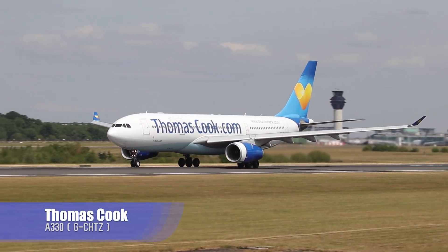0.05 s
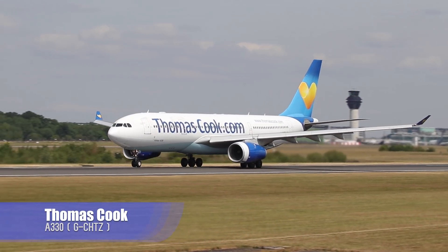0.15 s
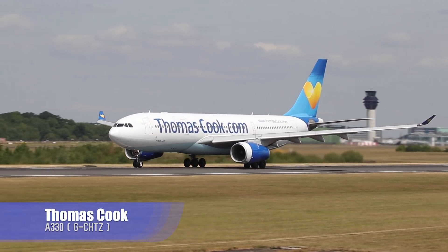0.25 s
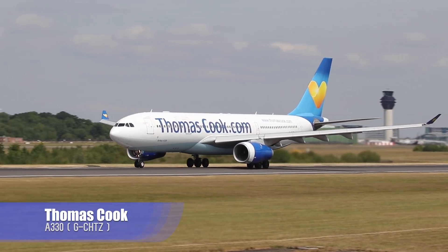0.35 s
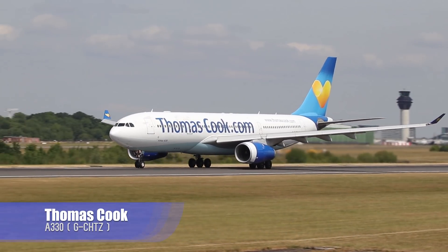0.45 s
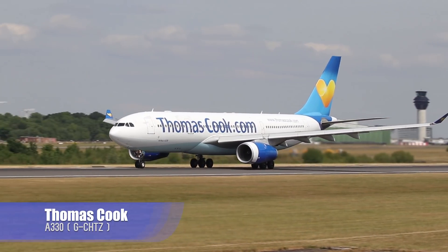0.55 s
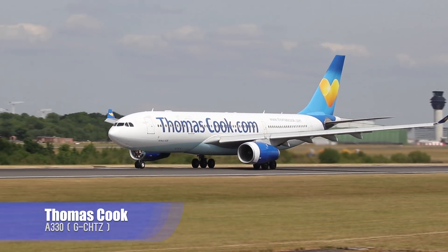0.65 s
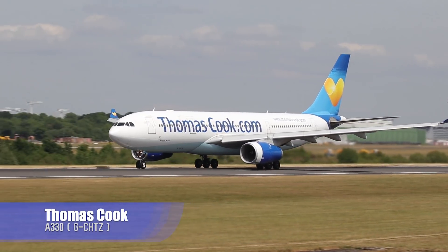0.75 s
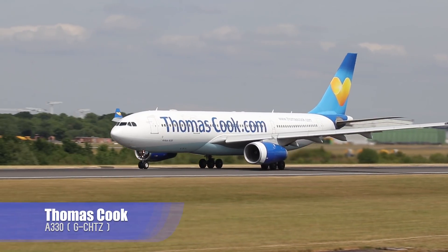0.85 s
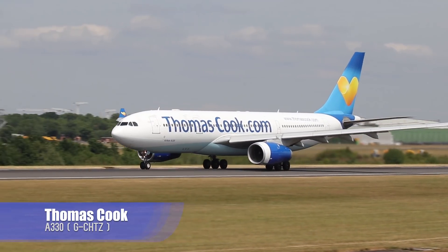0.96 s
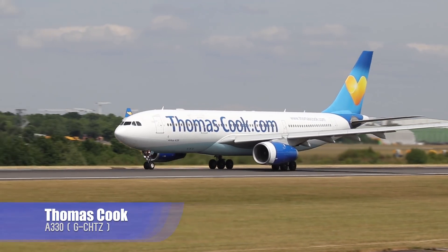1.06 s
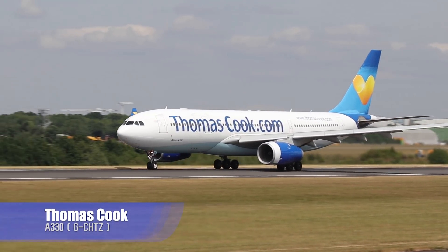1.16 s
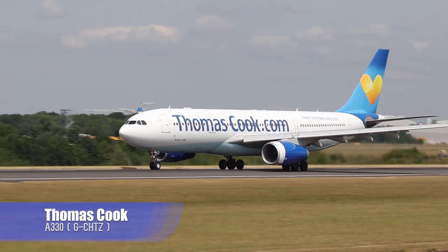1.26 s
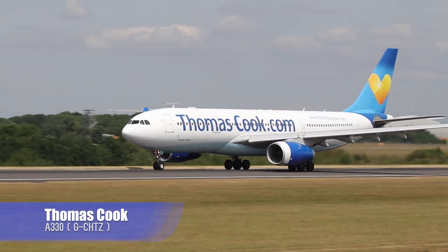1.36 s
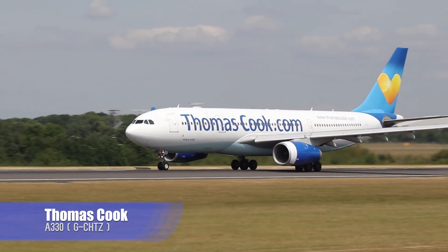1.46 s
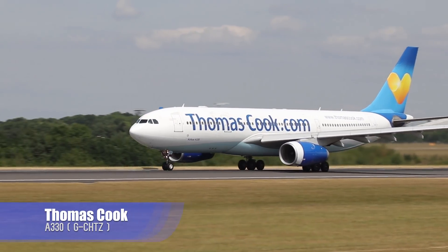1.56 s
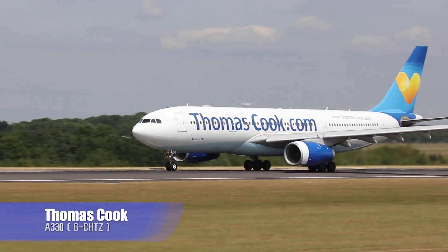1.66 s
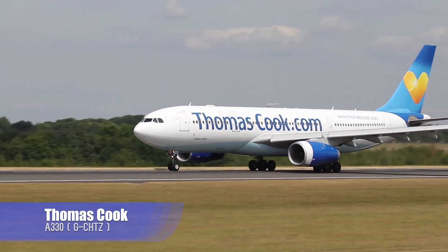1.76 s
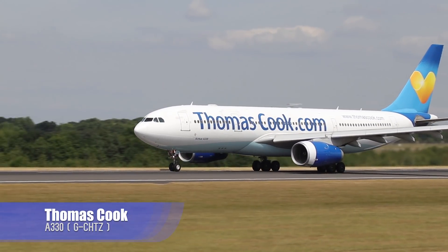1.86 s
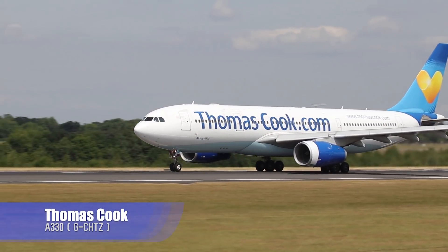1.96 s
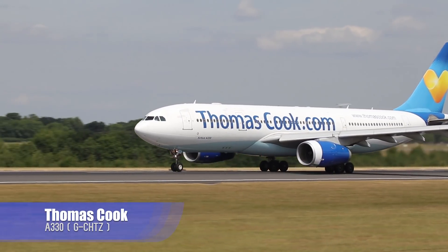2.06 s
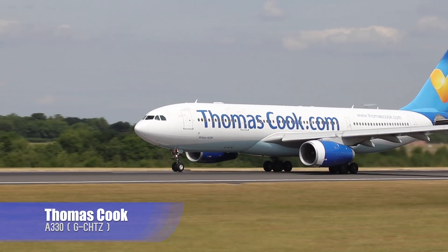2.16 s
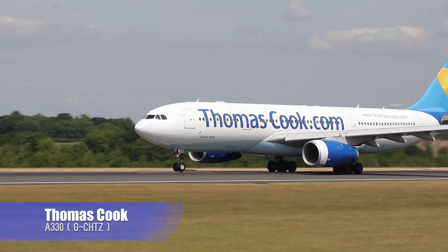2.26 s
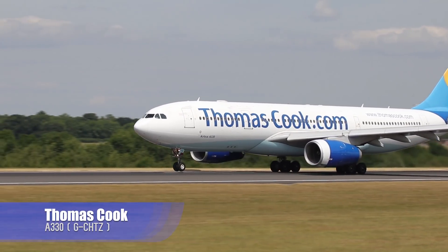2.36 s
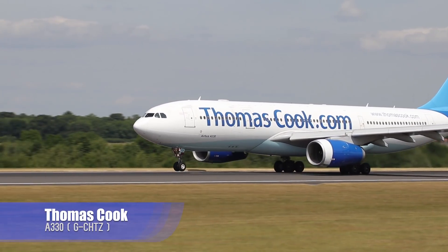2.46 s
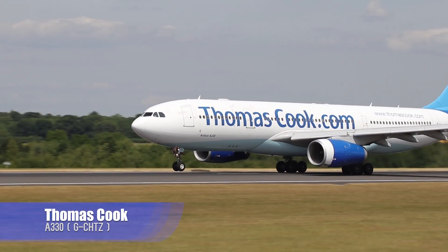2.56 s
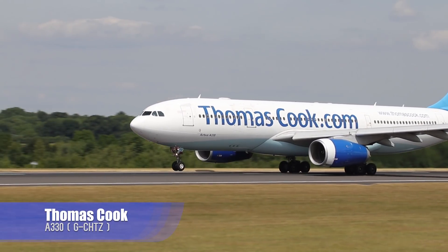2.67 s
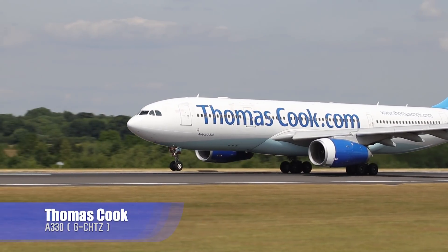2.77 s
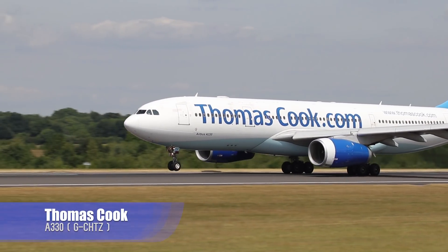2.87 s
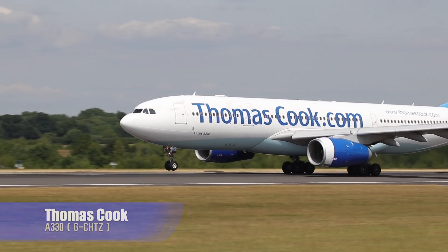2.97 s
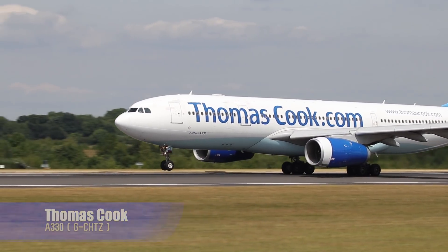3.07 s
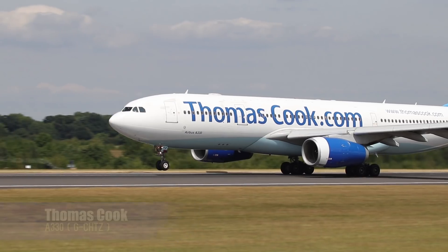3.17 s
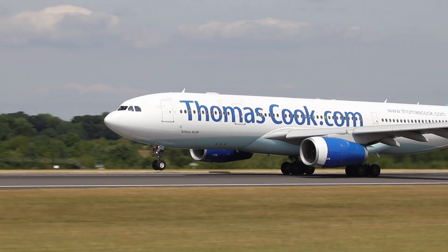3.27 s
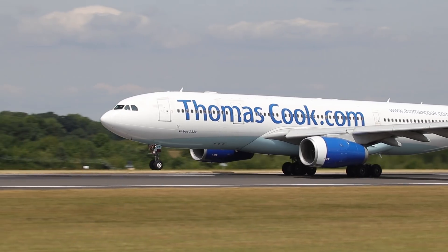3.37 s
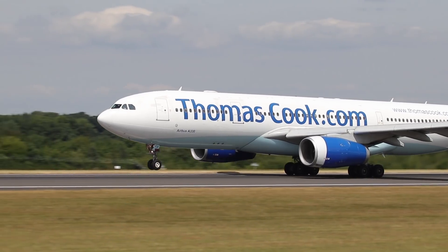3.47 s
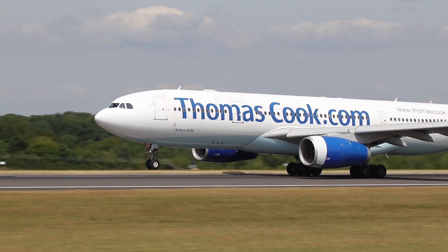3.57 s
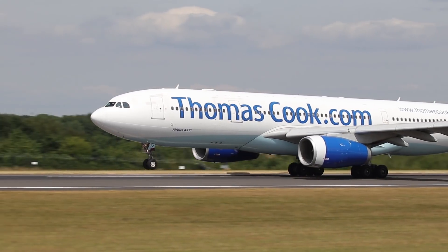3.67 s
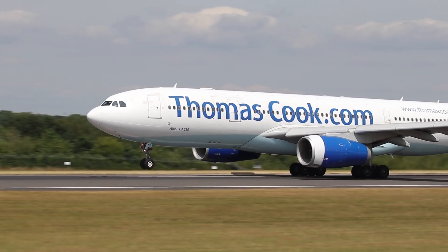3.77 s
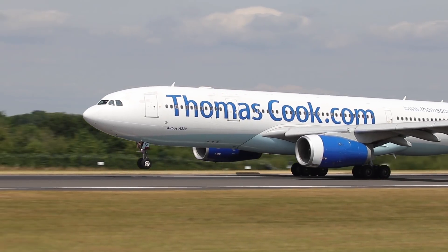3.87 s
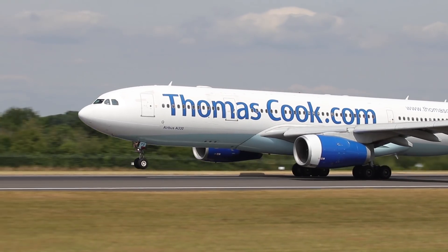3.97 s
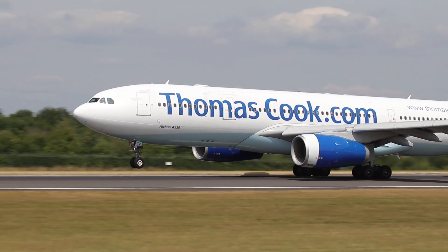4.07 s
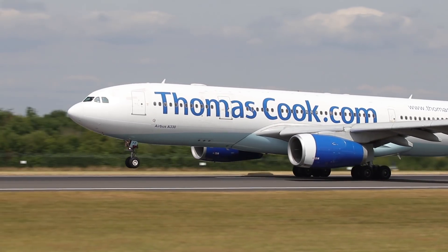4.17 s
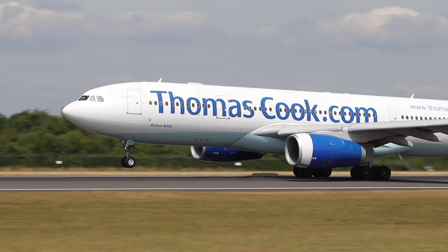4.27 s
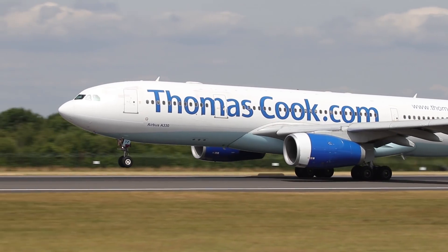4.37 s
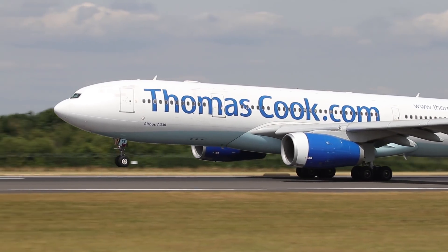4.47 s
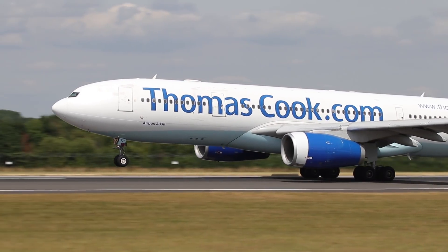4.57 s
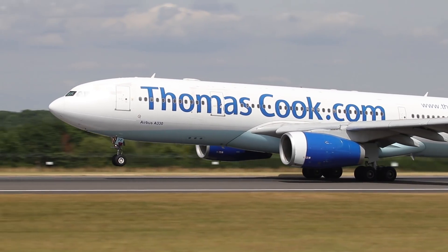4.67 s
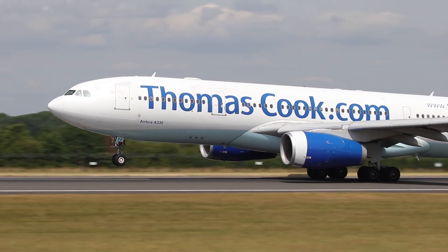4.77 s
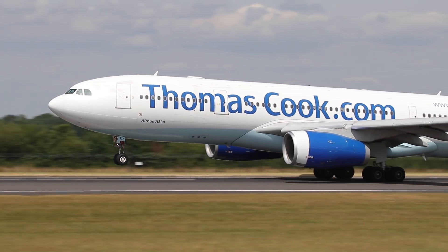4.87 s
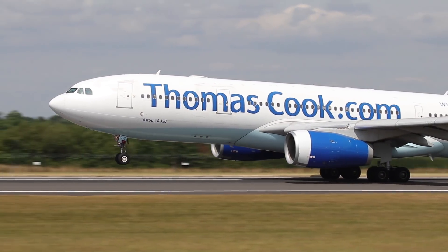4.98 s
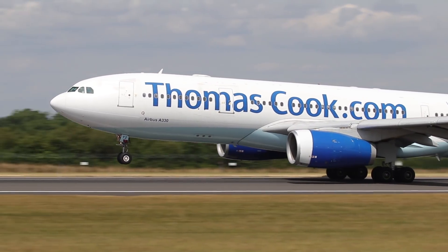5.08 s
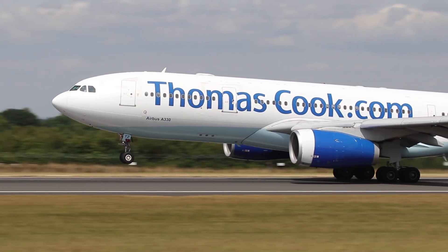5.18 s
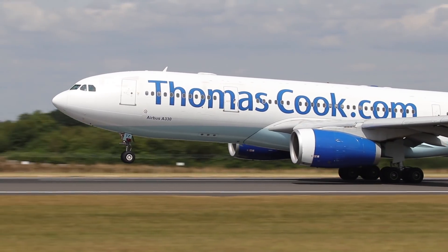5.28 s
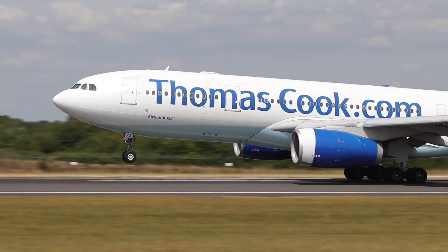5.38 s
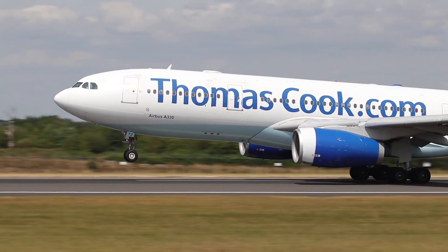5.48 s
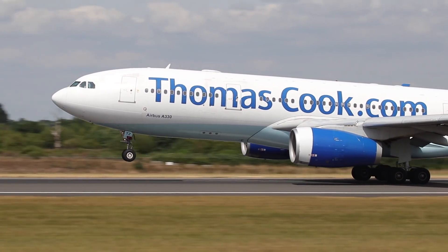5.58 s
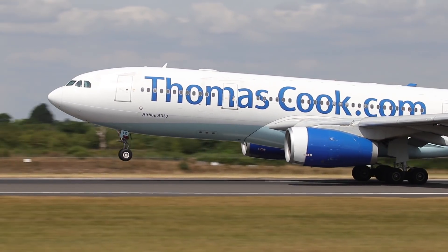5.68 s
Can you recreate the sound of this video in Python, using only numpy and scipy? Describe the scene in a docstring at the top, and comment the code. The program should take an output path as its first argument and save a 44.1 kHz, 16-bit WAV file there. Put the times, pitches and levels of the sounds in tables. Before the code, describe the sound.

A distant, dull jet roar grows steadily into a loud, gritty, buzzing rush as a big twin-engine airliner takes off along a runway.

```python
"""A distant roar is heard first, its treble dulled, with a faint hiss and a soft steady ticking close by.
A twin-engine airliner on its take-off run draws near: filtered noise makes exhaust, core howl, fan rush and rumble.
Sines at multiples of the fan shaft speed add a buzz that slides down and wavers; late crests pass full scale.
The aircraft is to the right of two microphone ports beside the runway, so the left one hears it later and shaded."""
import sys
import numpy as np
from scipy import signal
from scipy.io import wavfile
from scipy.ndimage import uniform_filter1d, minimum_filter1d, map_coordinates

SR = 44100
rng = np.random.default_rng(int(sys.argv[2]) if len(sys.argv) > 2 else 0)


def store_wav(level_fs):
    """Save 16-bit WAV to argv[1]."""
    pcm = np.round(np.clip(np.atleast_2d(level_fs), -1, 1) * 32767)
    wavfile.write(sys.argv[1], SR, pcm.T.astype(np.int16))


def gain_from_db(level_db):
    """Convert decibel levels to linear amplitude factors (20 dB per decade)."""
    decades = np.asarray(level_db, float) / 20
    return 10 ** decades


N = 252693
T = np.arange(N) / SR
FRAME, HOP = 2048, 256  # samples
HZ = np.arange(FRAME // 2 + 1)[:, None] * SR / FRAME

# Approach of the aircraft, before the loss in the air: time_s, roar_db, core_howl_db
APPROACH = [(0, -35.5, -36.5), (.4, -36, -39), (.6, -36, -36), (.78, -35, -41), (1.1, -31.5, -33),
            (1.5, -30.5, -35.5), (1.9, -27.5, -31), (2.3, -26, -30.5), (2.5, -26, -26), (3.0, -21.5, -26.5),
            (3.4, -22, -26), (3.85, -21, -25.5), (4.2, -20, -24), (4.55, -17, -21), (4.95, -15.5, -20.5),
            (5.13, -17, -18), (5.35, -15.5, -16.5), (5.5, -17.5, -19.5), (5.73, -16, -15.5)]
# Relative noise spectrum of the exhaust jet: frequency_hz, density_db
EXHAUST_COLOUR = [(70, -31), (100, -27), (130, -6.5), (170, -1.5), (220, 0.5), (270, -5), (340, 0),
                  (420, -5), (520, -6.5), (700, -36.5)]
# Relative noise spectrum of the fan rush: frequency_hz, density_db
FAN_COLOUR = [(600, -20), (800, -2), (1000, 0), (1400, -1), (1700, -5), (2000, -9.5), (2400, -16),
              (2900, -14), (3400, -20.5), (3900, -21.5), (4300, -26), (4600, -31.5), (4900, -38),
              (5300, -41.5), (5800, -50), (6500, -62), (7200, -80)]
# Relative noise spectrum of the ground rumble: frequency_hz, density_db
RUMBLE_COLOUR = [(12, -17.5), (30, 5), (55, -6), (80, -8.5), (120, -9.5), (200, -35.5)]
# Relative noise spectrum of the core howl: frequency_hz, density_db
CORE_COLOUR = [(350, -24), (480, -8.5), (600, 0.5), (720, -2), (820, -3), (950, -9.5), (1200, -42.5)]
# Treble lost on the way through air and over grass: time_s, loss_at_4_khz_db
TREBLE_LOSS = [(0, 17), (.8, 15), (1.3, 14), (1.8, 12), (2.15, 10.5), (2.4, 12.5), (2.7, 12), (3.8, 6),
               (4.35, 5.5), (4.65, 3.5), (4.98, 3), (5.15, 0.5), (5.73, 0.5)]
# A band of the roar swells and slides down as the nose lifts: time_s, centre_hz, lift_db
NOSE_LIFT_SWELL = [(3.9, 937, 1.5), (4.3, 880, 4), (5.0, 830, 1.5), (5.25, 732, 3), (5.42, 610, 2.5),
                   (5.73, 600, -0.5)]
# Two low bands of the roar that gust unevenly: centre_hz, width_hz
GUST_BANDS = [(336, 70), (195, 53)]
# Lift of those two bands: time_s, first_band_lift_db, second_band_lift_db
GUST_LIFTS = [(0, -3, -2), (.75, -3, -2), (.87, -2.5, 2), (1.06, 2, 1.5), (1.12, -1.5, -3.5),
              (1.2, 1.5, 1.5), (1.45, -2, 0.5), (1.57, 0.5, 3.5), (1.66, -1, 1), (1.73, -1.5, 5.5),
              (1.8, 4.5, 2), (1.94, -2, -2), (2.1, -1, 3), (2.25, -1.5, 2), (2.4, 1.5, -3), (2.5, 3, -0.5),
              (3.3, 1.5, -0.5), (3.8, -1.5, -1.5), (4.5, 2, 1), (5.0, 1, 0), (5.73, -1, 0.5)]
# Resonances of the ticking mechanism: centre_hz, width_hz, level_db
TICK_RESONANCES = [(4300, 500, 0), (5200, 900, -7), (6900, 1200, -10)]
# Strength of the ticks ahead of drift and resonances: time_s, level_db
TICK_LEVEL = [(0, -76), (.8, -71), (.95, -62), (1.2, -62), (1.4, -65), (2.1, -66), (5.73, -68)]
# Mean fan shaft speed as heard, sinking with the Doppler shift: time_s, shaft_hz
SHAFT_SPEED = [(0.0, 70.7), (2.0, 70.07), (2.5, 68.9), (3.1, 68.7), (3.75, 68), (4.2, 67.1), (4.6, 66.28),
               (5.0, 65.6), (5.3, 65), (5.73, 63.7)]
# Buzz of the supersonic blade tips, fading in and out in the unsteady air, before flutter:
# time_s, order_13_db
ORDER_13_LEVEL = [(0.0, -60), (0.36, -43), (0.78, -52), (0.86, -37), (0.95, -38), (1.05, -54), (1.15, -37),
                  (1.22, -45), (1.44, -42), (1.57, -48), (1.67, -33), (1.72, -43), (1.78, -33), (1.86, -47),
                  (1.94, -34), (2.03, -35), (2.09, -47), (2.14, -37), (2.25, -42), (2.42, -39), (2.55, -31),
                  (2.85, -29), (2.96, -32), (3.05, -17), (3.15, -31), (3.24, -23), (3.5, -46), (3.76, -22),
                  (3.87, -30.5), (4.02, -25), (4.09, -29), (4.2, -25), (4.35, -34), (4.43, -34),
                  (4.47, -21), (4.54, -21), (4.61, -14.5), (4.69, -25), (4.78, -13.5), (4.84, -28),
                  (4.87, -16), (4.92, -15), (5.0, -21), (5.05, -20), (5.09, -36), (5.2, -36), (5.25, -20),
                  (5.32, -18), (5.37, -38), (5.73, -36)]
# Weaker orders that follow order 13: order, level_relative_to_order_13_db
FOLLOWING_ORDERS = [(14, -14), (26, -28.5)]
# Lower orders come out as the aircraft draws near; each before flutter: time_s, level_db
ORDER_12_LEVEL = [(0, -62.5), (2.9, -46.5), (3.9, -45), (4.05, -29), (4.35, -46), (4.55, -27.5), (4.7, -36),
                  (4.9, -29.5), (5.13, -23), (5.22, -34), (5.73, -40)]
ORDER_11_LEVEL = [(0, -70), (4.9, -45), (5.07, -25), (5.17, -38), (5.27, -20), (5.33, -34), (5.47, -23),
                  (5.55, -32), (5.62, -27), (5.73, -30)]
ORDER_9_LEVEL = [(0, -69.5), (4.9, -45.5), (5.08, -26.5), (5.2, -31), (5.32, -27), (5.42, -21),
                 (5.49, -23.5), (5.55, -41), (5.73, -40)]
# Tallest crests, where buzz and roar pile up: time_s, signed_pressure_full_scale, sharpness_hz
TALL_CRESTS = [(4.717, -1.09, 950), (4.8434, 1.27, 1080), (4.8884, -1.075, 680), (4.9285, .95, 900),
               (4.9297, 1.24, 1080), (4.9536, -1.045, 950), (4.9662, 1.0, 950)]
# Left port against right with the aircraft abeam, at full share: frequency_hz, gain_db, lag_radians
PORT_SHADE = [(0, .5, 0), (250, .3, .5), (450, -2, .9), (800, -3.5, 1.3), (1300, -8.5, 1.6),
              (1900, -4.5, 1.9), (2600, -7.5, 3.0), (3500, -11, 4.0), (4000, -15, 4.6), (4400, -18, 3.7),
              (4900, -12, 3.9), (5400, -13.5, 4.8), (7000, -9, 6.3)]


def to_frames(x):
    """Short-time Fourier analysis: resolve a wave into overlapping spectra."""
    return signal.stft(x, nperseg=FRAME, noverlap=FRAME - HOP)[2]


def from_frames(spectra):
    """Overlap-add synthesis: superpose short spectra into a wave."""
    return signal.istft(spectra, nperseg=FRAME, noverlap=FRAME - HOP)[1][..., :N]


def colour(points):
    """Spectral density: power per bin with mean 1, falling on beyond the given ends."""
    hz, db = np.transpose(points)
    all_hz = np.r_[1, hz, SR]
    all_db = np.r_[db[0] - 40, db, db[-1] - 150]
    power = gain_from_db(2 * np.interp(np.log(HZ + 1), np.log(all_hz), all_db))
    return power / power.mean()


def walk(rate_hz, count=1):
    """Random modulation: cubic curves through normal random knots give a smooth drift."""
    knots = rng.standard_normal((count, int(N / SR * rate_hz) + 4))
    return np.array([map_coordinates(k, [T * rate_hz + 1], order=3) for k in knots])


def patches(s, rate_hz, spread_db, count):
    """Turbulent scintillation: eddies make neighbouring bands swell and sink together."""
    field = rng.standard_normal((count, int(N / SR * rate_hz) + 4))
    band = np.log2(1 + HZ / 60) / 9 * (count - 1)
    where = np.broadcast_arrays(band, s * rate_hz + 1)
    return gain_from_db(spread_db * map_coordinates(field, where, order=1, mode="nearest"))


def roar():
    """Broadband jet and fan noise: random pressures are coloured, then absorbed more at higher pitch."""
    noise = to_frames(rng.standard_normal(N))
    s = np.arange(noise.shape[1])[None] * HOP / SR
    time_s, roar_db, core_db = np.transpose(APPROACH)
    near_db = -16
    approach_db = np.interp(s, time_s, roar_db) - near_db

    # colour, level at near_db, share of the approach that the layer follows
    layers = [(EXHAUST_COLOUR, -18, 0.94), (FAN_COLOUR, -15, 1.058), (RUMBLE_COLOUR, -31.5, 0.41)]
    power = gain_from_db(2 * np.interp(s, time_s, core_db)) * colour(CORE_COLOUR)
    for points, level_db, share in layers:
        power = power + gain_from_db(2 * (level_db + share * approach_db)) * colour(points)

    loss_from_hz = 1400
    loss_db = np.interp(s, *np.transpose(TREBLE_LOSS))
    air = gain_from_db(-loss_db * np.maximum(HZ - loss_from_hz, 0) / (4000 - loss_from_hz))

    time_s, centre_hz, lift_db = np.transpose(NOSE_LIFT_SWELL)
    swell_width_hz = 120
    swell_band = np.exp(-((HZ - np.interp(s, time_s, centre_hz)) / swell_width_hz) ** 2)
    swell = gain_from_db(np.interp(s, time_s, lift_db) * swell_band)

    time_s, *lifts = np.transpose(GUST_LIFTS)
    gust_db = 0
    for lift_db, (centre_hz, width_hz) in zip(lifts, GUST_BANDS):
        gust_db = gust_db + np.interp(s, time_s, lift_db) * np.exp(-((HZ - centre_hz) / width_hz) ** 2)

    slow_eddies = patches(s, 5, 1.3, count=24)
    fast_eddies = patches(s, 18, 0.46, count=10)
    return noise * np.sqrt(power) * air * swell * gain_from_db(gust_db) * slow_eddies * fast_eddies


def hiss():
    """Steady background noise: independent random pressures at each port, rolled off above a bend."""
    bend_hz, level_db = 4200, -67  # level before the roll-off
    noise = rng.standard_normal((2, N))
    return gain_from_db(level_db) * signal.lfilter(*signal.butter(2, bend_hz, fs=SR), noise)


def ticks():
    """Excited resonance: a small mechanism's brief noise bursts ring through three band filters."""
    start_s, period_s, rise_s = .005, .1044, .0045
    age = (T - start_s) % period_s / rise_s
    burst = age * np.exp(1 - age)  # peaks at 1 after rise_s
    level = gain_from_db(np.interp(T, *np.transpose(TICK_LEVEL)) + 4 * walk(9)[0])
    rattle = burst * level * rng.standard_normal(N)
    rings = 0
    for centre_hz, width_hz, db in TICK_RESONANCES:
        resonance = signal.iirpeak(centre_hz, centre_hz / width_hz, SR)
        rings = rings + gain_from_db(db) * signal.lfilter(*resonance, rattle)
    return rings


def buzz():
    """Harmonics of rotation: sines at multiples of shaft speed, trembling in pitch and level in the air."""
    tremble = 1 + 0.003 * walk(18)[0] + .0015 * walk(45)[0]
    turns = np.cumsum(np.interp(T, *np.transpose(SHAFT_SPEED)) * tremble) / SR
    curves = [(13, ORDER_13_LEVEL), (12, ORDER_12_LEVEL), (11, ORDER_11_LEVEL), (9, ORDER_9_LEVEL)]
    lines = [(order, np.interp(T, *np.transpose(curve))) for order, curve in curves]
    main_db = lines[0][1]
    lines += [(order, main_db + db) for order, db in FOLLOWING_ORDERS]
    flutter_db = 2 * walk(22, count=6)
    tones = 0
    for (order, level_db), flutter in zip(lines, flutter_db):
        # the square root of 2 turns an rms level into a sine's peak
        tone = np.sin(2 * np.pi * round(order) * turns)
        tones = tones + np.sqrt(2) * gain_from_db(level_db + flutter) * tone
    return tones


def crests(x):
    """Peak superposition: peaks ease under a ceiling, then brief cosines swing out to the tall crests."""
    ceiling, ease_s, crest_s = .9, .004, .0005
    size = int(ease_s * SR)
    gain = minimum_filter1d(ceiling / np.maximum(np.abs(x), ceiling), size=2 * size)
    x = x * uniform_filter1d(uniform_filter1d(gain, size=size), size=size)
    for time_s, pressure, sharpness_hz in TALL_CRESTS:
        bell = np.exp(-((T - time_s) / crest_s) ** 2)
        x = x * (1 - bell) + pressure * bell * np.cos(2 * np.pi * sharpness_hz * (T - time_s))
    return x


def ports(right):
    """Diffraction and scattering: the left port is shaded and delayed, and ground scatter blurs its likeness."""
    s = np.arange(right.shape[1])[None] * HOP / SR
    # the aircraft comes steadily round to the side
    shade_share = 0.67 + .055 * s
    lag_share = 0.56 + 0.093 * s
    hz, gain_db, lag_radians = np.transpose(PORT_SHADE)
    shade = gain_from_db(np.interp(HZ, hz, gain_db) * shade_share)
    lag = np.exp(-1j * np.interp(HZ, hz, lag_radians) * lag_share)
    scatter_db, scatter_hz = 0, 1000  # level of the scattered sound at that frequency
    random_phase = np.exp(2j * np.pi * rng.random(right.shape))
    scattered = np.abs(uniform_filter1d(np.abs(right), size=9, axis=1)) * random_phase
    blurred = right + gain_from_db(scatter_db) * np.sqrt(HZ / scatter_hz) * scattered
    return from_frames(np.array([shade * lag * blurred, right]))


def scene():
    """Linear superposition: the aircraft at both ports plus ticking and hiss, which both lack top."""
    near_top_hz = 6800
    low_pass = signal.cheby1(8, .5, near_top_hz, fs=SR, output="sos")
    near = signal.sosfilt(low_pass, hiss() + ticks())
    aircraft = crests(from_frames(roar()) + buzz())
    return ports(to_frames(aircraft)) + near


def top_cut(x):
    """Nothing passes above the cut-off."""
    return signal.sosfilt(signal.butter(12, 16000, fs=SR, output="sos"), x)


def record(dry):
    """Hard clipping: peaks flatten with a click; then a low-pass dulls the top, less around the hardest clicks."""
    low_pass_hz, hard_click, click_share = 9700, 1.15, .45
    flat = np.clip(dry, -.99, .99)
    low = signal.sosfiltfilt(signal.butter(10, low_pass_hz, fs=SR, output="sos"), flat)
    hard_clicks = 1. * (np.abs(dry) > hard_click)
    kept_top = np.minimum(60 * uniform_filter1d(hard_clicks, size=201), click_share)
    mix = low + kept_top * (flat - low)
    return top_cut(mix)


dry = scene()
out = record(dry)
store_wav(out)
```